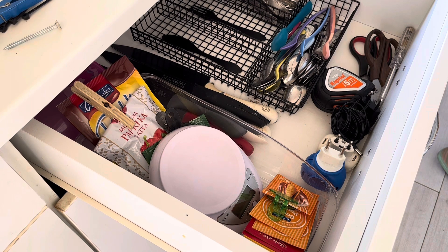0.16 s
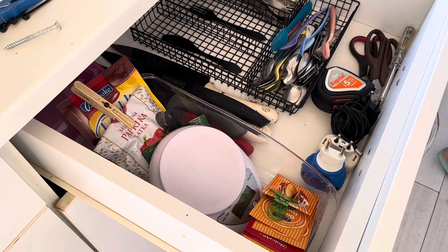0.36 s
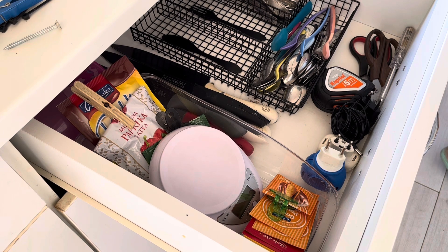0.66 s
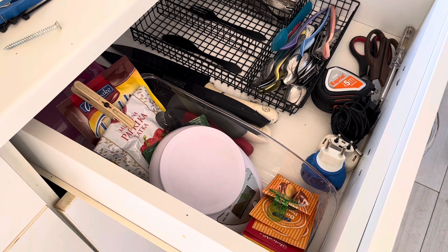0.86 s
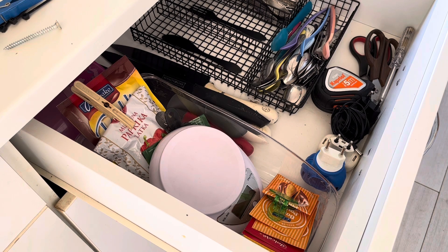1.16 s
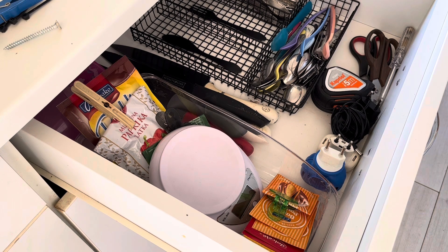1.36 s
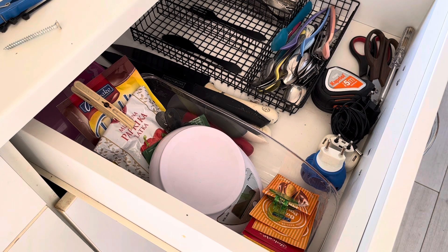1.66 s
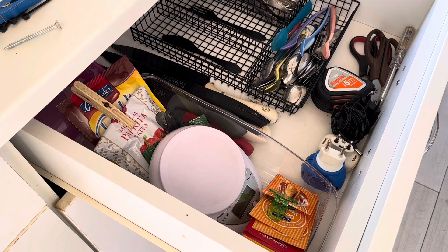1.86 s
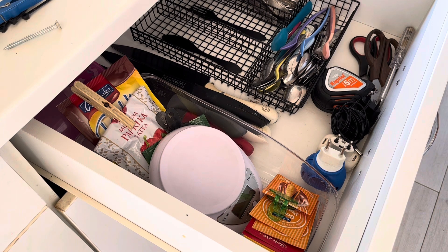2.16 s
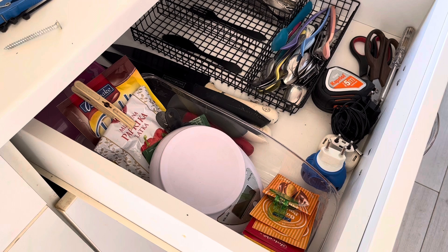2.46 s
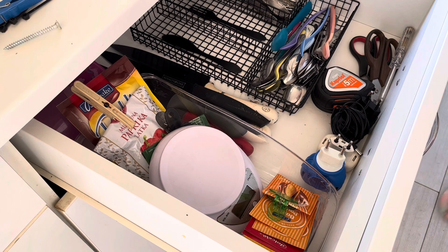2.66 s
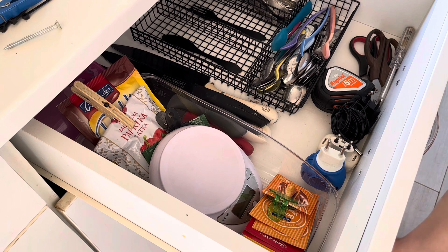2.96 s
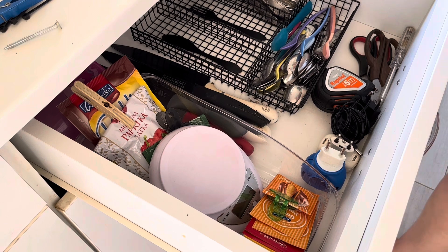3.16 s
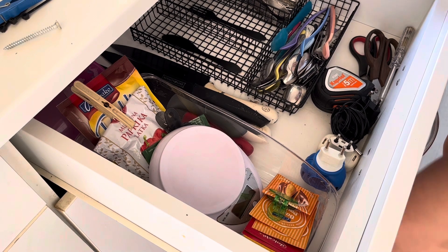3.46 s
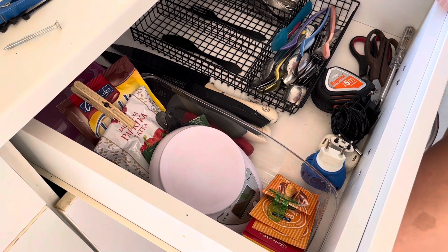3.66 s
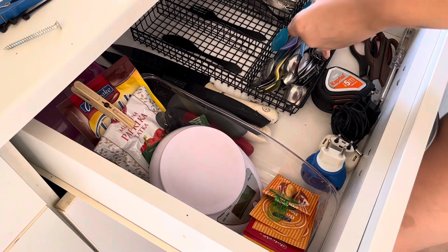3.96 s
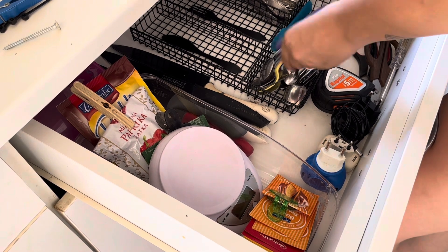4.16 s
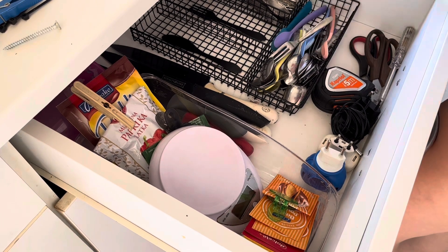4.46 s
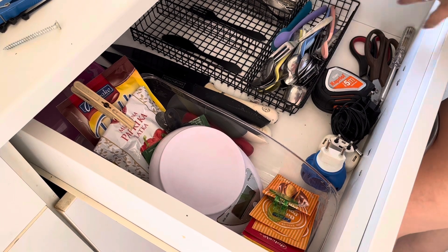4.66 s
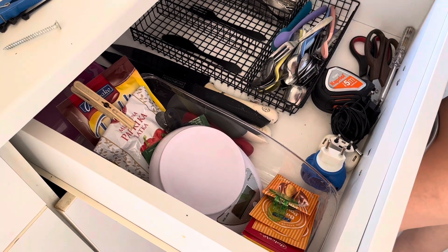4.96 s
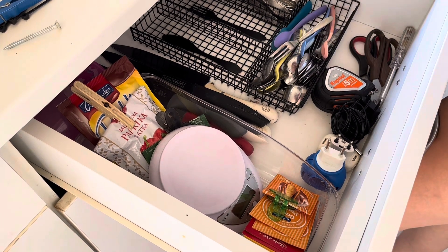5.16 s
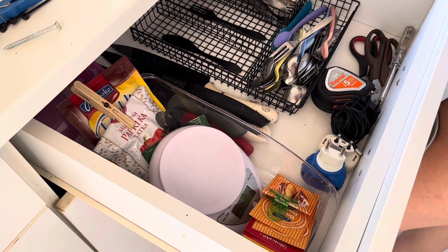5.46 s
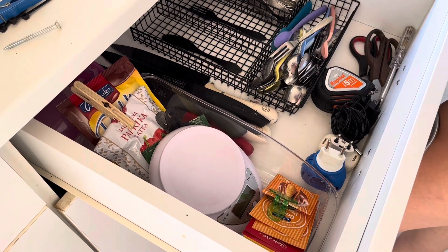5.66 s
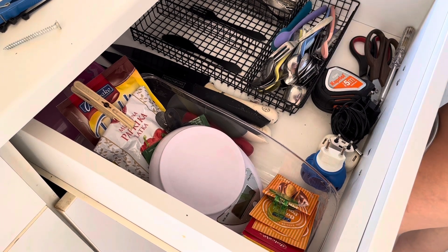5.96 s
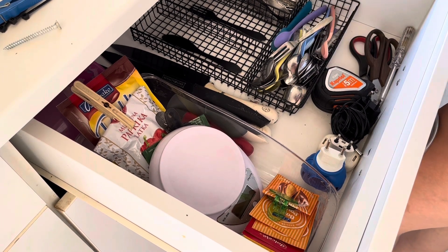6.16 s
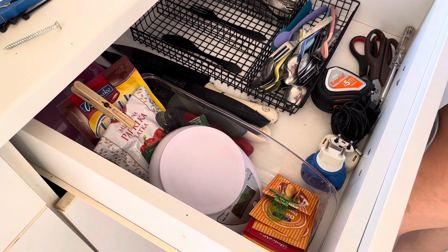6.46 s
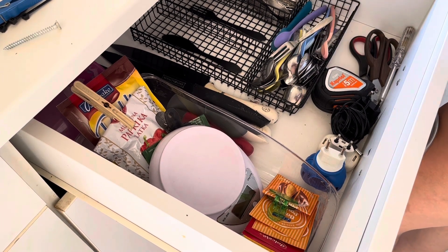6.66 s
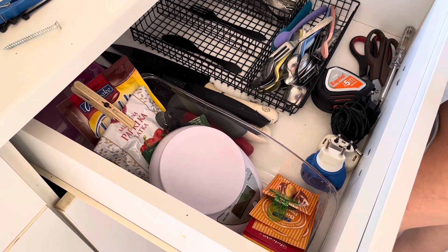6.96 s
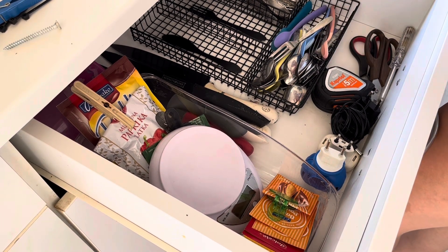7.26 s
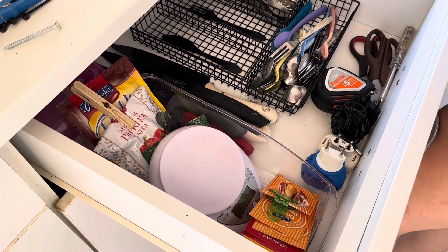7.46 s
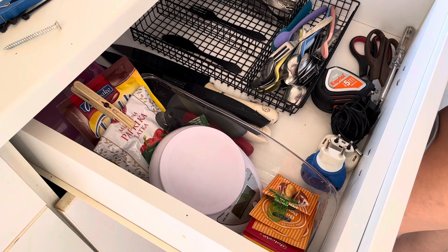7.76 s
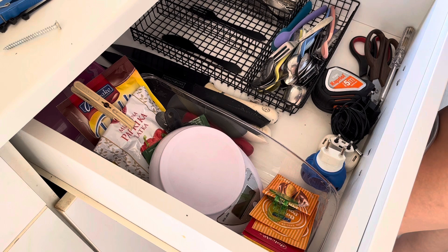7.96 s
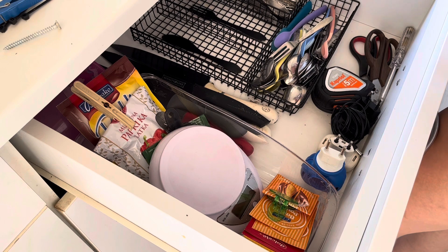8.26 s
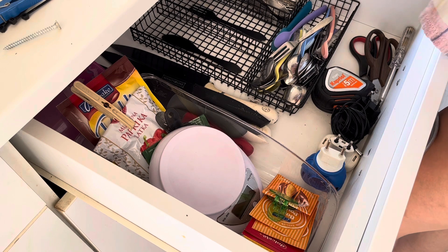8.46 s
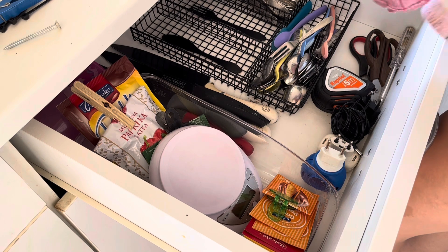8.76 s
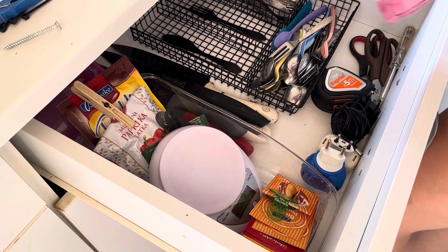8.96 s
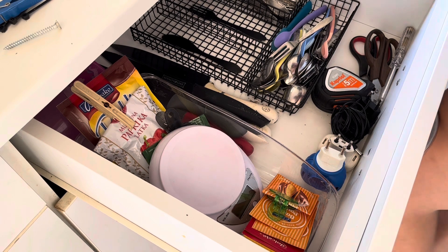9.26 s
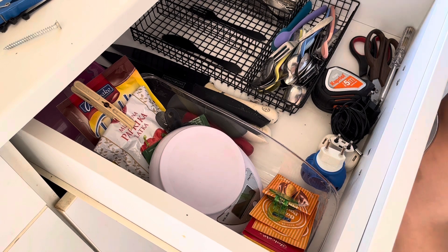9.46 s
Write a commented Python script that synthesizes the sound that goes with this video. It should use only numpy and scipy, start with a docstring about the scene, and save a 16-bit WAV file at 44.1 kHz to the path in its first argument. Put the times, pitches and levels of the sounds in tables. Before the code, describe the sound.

Steel cutlery clinks, slides and clatters as it is sorted in a wire basket, with a few thumps from the kitchen drawer.

```python
"""Close to an open drawer in a small hard kitchen, a small microphone hears steel cutlery being sorted.
Over a faint steady hum, the first pieces clink and slide, and a spoon and a fork ring on.
About a second in, a jolt makes the drawer rumble and thump; at four seconds the wire basket is struck.
Lighter touches follow, then the busiest clatter from seven seconds on. Throughout, the heap
settles in faint ticks and the kitchen rings briefly after each clink."""
import sys
import numpy as np
from scipy import signal
from scipy.fft import irfft
from scipy.io import wavfile

SR = 44100
rng = np.random.default_rng(int(sys.argv[2]) if len(sys.argv) > 2 else 0)


def wrap_up_sound(samples):
    """Save the sound to the file named by the first command line argument, as 16-bit audio."""
    columns = np.atleast_2d(samples).T
    # keep every value between -1 and 1, then stretch to whole-number steps
    tamed = np.clip(columns, -1, 1)
    steps = np.round(tamed * 32767).astype(np.int16)
    wavfile.write(sys.argv[1], SR, steps)


N = 423351
AGE = np.arange(int(.45 * SR)) / SR   # seconds since a touch
BAND_EDGES_HZ = np.geomspace(30, 17000, 24)
BAND_HZ = np.sqrt(BAND_EDGES_HZ[1:] * BAND_EDGES_HZ[:-1])


def from_db(db):
    return 10 ** (np.asarray(db) / 20)


def rms_one(x):
    return x / np.sqrt(np.mean(x ** 2) + 1e-20)


def energy_one(x):
    return x / np.sqrt(np.sum(x ** 2) + 1e-20)


def at_hz(points, hz):
    """Read rows of (Hz, value) on a log-frequency axis."""
    row_hz, value = np.transpose(points)
    return np.interp(np.log(hz), np.log(row_hz), value)


def fade(t60):
    """A decay that loses 60 dB in t60 seconds."""
    return np.exp(-np.log(1000) * AGE / np.maximum(t60, 1e-3))


def add(out, start_s, sound):
    """Mix a sound in at its start time."""
    i = max(int(start_s * SR), 0)
    out[i:i + len(sound)] += sound[:max(N - i, 0)]


def noise_bands():
    """One row of noise per band; neighbours are unrelated."""
    white = rng.standard_normal((2, N + len(AGE)))
    bands = []
    for k in range(len(BAND_HZ)):
        bandpass = signal.butter(2, BAND_EDGES_HZ[k:k + 2], "band", fs=SR, output="sos")
        bands.append(signal.sosfilt(bandpass, white[k % 2])[-N:])
    return np.array(bands)


def coloured(bands, spectrum):
    """A short random stretch of the bands, mixed to a spectrum; rms 1."""
    i = rng.integers(bands.shape[1] - len(AGE))
    return rms_one(from_db(at_hz(spectrum, BAND_HZ)) @ bands[:, i:i + len(AGE)])


def struck(modes, spread_db=2.0):
    """Decaying sines; each blow favours the modes differently."""
    out = np.zeros(len(AGE))
    for hz, db, t60 in modes:
        strength = from_db(db + spread_db * rng.standard_normal()) * rng.choice([-1, 1])
        out += strength * np.sin(2 * np.pi * hz * AGE) * fade(t60)
    return out


def slips(length_s, start_db, end_db, per_s, spread_db):
    """Catching and slipping: random little impacts under a ramp of level, for 0.45 s at most."""
    size = max(int(length_s * SR), 2)
    chance = rng.random(len(AGE))[:size]
    hit = chance <= max(per_s / SR, chance.min())   # at least one impact
    strength = from_db(spread_db * np.clip(rng.standard_normal(len(AGE))[:size], -2, 2))
    clicks = hit * strength * rng.choice([-1, 1], len(AGE))[:size]
    return rms_one(clicks) * from_db(np.linspace(start_db, end_db, len(clicks)))


# The kitchen's room tone. Each row: frequency in Hz, relative spectral density in dB.
AIR_SPECTRUM = [(30, -14), (50, -4), (100, -3), (160, -4.5), (350, -1.5), (500, 1), (800, -0.5),
                (1300, -1.5), (1700, -6), (2600, -13), (4000, -16), (9000, -18), (12000, -20), (16000, -32)]
# Resonances in that air. Each row: frequency in Hz, width in Hz, relative level in dB.
AIR_RESONANCES = [(200, 15, -22), (610, 35, -8), (1260, 100, -7), (3020, 110, -16)]


def hum(bands, air_db=-45.5, resonance_db=-47.0):
    """Steady household air noise with a few resonances, far behind the cutlery."""
    air = from_db(air_db) * rms_one(from_db(at_hz(AIR_SPECTRUM, BAND_HZ)) @ bands)
    for hz, width_hz, db in AIR_RESONANCES:
        peak = signal.iirpeak(hz, hz / width_hz / 2, fs=SR)
        drone = signal.lfilter(*peak, signal.lfilter(*peak, rng.standard_normal(N)))
        air += from_db(resonance_db + db) * rms_one(drone)
    return air


# The kitchen's reverberation. Each row: frequency in Hz, time to fall 60 dB in seconds.
KITCHEN_DECAY = [(100, 0.31), (500, 0.34), (1500, 0.34), (4000, 0.34), (9000, 0.29), (15000, 0.22)]


def reflections(x, bands, build_s=0.0016):
    """The kitchen's answer to one spot: it builds within milliseconds and dies away, the treble first."""
    i = rng.integers(N - len(AGE))
    tails = bands[:, i:i + len(AGE)] * fade(at_hz(KITCHEN_DECAY, BAND_HZ)[:, None])
    build = 1 - np.exp(-(AGE / build_s) ** 2)
    return signal.oaconvolve(x, energy_one(tails.sum(axis=0) * build))[:N]


def scattered_reflections(x, bands, spots=6, step_s=0.006):
    """Successive touches lie at different spots in the basket, each with its own paths to the mic."""
    spot = np.arange(N) / (step_s * SR)
    out = np.zeros(N)
    for k in range(spots):
        nearness = np.maximum(1 - np.abs((spot - k) % spots - 1), 0)
        out += reflections(x * np.sqrt(nearness), bands)
    return out


# The rustle of handling at the drawer. Each row: time in seconds, level in dB.
HANDLING_LEVEL = [(0, -41.5), (.15, -48), (.8, -45), (3.0, -50.5), (3.6, -45), (3.9, -88), (4.7, -59),
                  (4.8, -47.5), (5.3, -50.5), (6.0, -58), (6.7, -57), (8.0, -44.5), (9.6, -50)]
# Its colour. Each row: frequency in Hz, relative spectral density in dB.
HANDLING_SPECTRUM = [(1000, -8), (2500, 3), (4500, -1.5), (10000, -0.5), (16000, -14)]


def rustle(bands):
    """A soft bright hiss that comes and goes with the handling."""
    level_db = np.interp(np.arange(N) / SR, *np.transpose(HANDLING_LEVEL))
    hiss = rms_one(from_db(at_hz(HANDLING_SPECTRUM, BAND_HZ)) @ bands)
    return from_db(level_db) * hiss[::-1]   # reversed, so it is unrelated to the hum


def settling(bands, per_s=6.0, chances=120, low_hz=5000, high_hz=11100):
    """The heap settles in faint ticks, as strong as the handling around them; each lets a partial sing."""
    when, chance, pitch = rng.random((3, chances))
    times = when * N / SR
    scatter_db = 0.5 * np.clip(rng.standard_normal(chances), -2, 2)
    levels = np.interp(times, *np.transpose(HANDLING_LEVEL)) + 3.5 - scatter_db
    partials = low_hz + pitch * (high_hz - low_hz)
    ticks = np.column_stack([times, levels, partials])[chance < per_s * N / SR / chances]
    ring_db, dull_db, sparkle_db, sung_t60 = 3, 2, -6.0, 0.12
    out = clinks(bands, [(s, db, ring_db, dull_db, sparkle_db) for s, db, _ in ticks])
    for s, db, sung_hz in ticks:
        add(out, s, struck([(sung_hz, db + 0.5, sung_t60)]))
    return out


# Jolts of the drawer. Each row: start and length in seconds, relative first and last level in dB,
# bass gain in dB.
DRAWER_JOLTS = [(0.95, 0.064, -27.5, -21, 2), (1.016, 0.067, -26.5, -19, 4),
                (1.097, 0.067, -13.5, -24.5, 7), (2.246, 0.11, -50, -50, 39),
                (4.071, 0.012, -30, -10.5, -35), (4.104, .09, -31.5, -20.5, -9.5),
                (9.093, 0.25, -49, -31.5, -22)]
# The thud of its panels. Each row: frequency in Hz, relative spectral density in dB.
PANEL_SPECTRUM = [(45, -2), (90, -21), (120, -20), (175, -4.5), (220, -25), (285, 4.5), (420, -11),
                  (650, -3.5), (950, -4.5), (1300, -6.5), (3000, -15), (6000, -41)]
# Their modes. Each row: frequency in Hz, relative level in dB, time to fall 60 dB in seconds.
PANEL_MODES = [(172.6, -11.5, 0.28), (282, -5, 0.16), (323.5, -8.5, 0.15), (470, -7, 0.1),
               (699, -22, 0.062), (930, -11, 0.12)]


def drawer_judders(bands, thud_t60=0.03, modes_db=0.5, level_db=-2.8):
    """A jolted drawer judders in quick impacts that shake its panels."""
    out = np.zeros(N)
    for s, length_s, start_db, end_db, bass_db in DRAWER_JOLTS:
        bass = [(180, bass_db), (400, 0)]   # each jolt has its own bass, from deep thud to thin rattle
        spectrum = np.column_stack([BAND_HZ, at_hz(PANEL_SPECTRUM, BAND_HZ) + at_hz(bass, BAND_HZ)])
        for _ in range(4):   # the drawer bears on four corners
            thud = energy_one(coloured(bands, spectrum) * fade(thud_t60))
            ring = from_db(modes_db + min(bass_db, 0)) * energy_one(struck(PANEL_MODES))
            impacts = slips(length_s, start_db, end_db, per_s=500, spread_db=5.0)
            add(out, s, signal.fftconvolve(impacts, thud + ring) / 2)
    return from_db(level_db) * out


# Soft bumps on the drawer. Each row: start in seconds, level in dB.
DRAWER_BUMPS = [(1.295, -34), (1.39, -30.5), (2.16, -39.5), (2.25, -36.5), (2.818, -30.5), (2.855, -27),
                (3.32, -33), (3.679, -36.5), (3.852, -39), (9.19, -33.5), (9.26, -36.5)]


def drawer_bumps(bands, centre_hz=412, db_per_octave=-17.0, rise_s=0.0045, t60=0.25):
    """Small bumps give a short dull knock."""
    out = np.zeros(N)
    hump = np.column_stack([BAND_HZ, db_per_octave * np.abs(np.log2(BAND_HZ / centre_hz))])
    envelope = fade(t60) * (1 - np.exp(-AGE / rise_s))
    for s, db in DRAWER_BUMPS:
        add(out, s, from_db(db) * coloured(bands, hump) * envelope)
    return out


# The basket's modes. Each row: frequency in Hz, relative level in dB, time to fall 60 dB in seconds.
BASKET_MODES = [(176, -6, 0.22), (240.4, -6, 0.39), (274, -10, 0.24), (332.3, 0, 0.25), (690, -26, 0.16),
                (975, -18, 0.14), (1260, 5.5, 0.042)]
# Blows on it. Each row: start in seconds, level in dB.
BASKET_BLOWS = [(4.075, -32), (4.15, -24.5), (4.204, -29.5)]


def basket():
    """The wire basket on the drawer's bottom rings low after a blow."""
    out = np.zeros(N)
    for s, db in BASKET_BLOWS:
        add(out, s, from_db(db) * struck(BASKET_MODES))
    return out


# Modes of two pieces. Each row: frequency in Hz, relative level in dB, time to fall 60 dB in seconds.
SPOON_MODES = [(4720, -29, 0.28), (6930, -42, 0.41), (8430, -8, 0.14), (9539, -25, 0.2), (9890, -13, 0.2),
               (10735, -14, 0.14), (11970, -5, 0.12), (13700, -11, .17), (13700, -16, .16),
               (13950, -15, .16), (14600, -10, .1), (14800, -17, .15)]
FORK_MODES = [(2050, -27, 0.083), (4150, -12, .08), (4450, -30, 0.031), (4600, -13, 0.14),
              (5630, -18, 0.088), (6200, -16, .09), (8200, -16, .22), (8600, -15, .16), (9320, -21, 0.063),
              (11330, -19, 0.13), (15165, -17, .13)]
# Blows on them. Each row: start in seconds, level in dB, the partial that sings out in Hz.
SPOON_BLOWS = [(.28, -20, 6930), (.44, -26, 13950), (3.498, -27, 8430), (4.865, -25, 8430),
               (7.175, -9.5, 10735), (7.447, -16, 9890), (7.51, -18, 8430)]
FORK_BLOWS = [(.44, -14, 8600), (1.585, -11, 9320), (1.627, -27, 11330), (2.245, -25, 4450),
              (4.15, -9.5, 11330), (5.764, -30, 2050), (6.035, -20.5, 4450), (6.035, -21, 9320),
              (6.55, -27.5, 5630), (7.93, -27, 15165), (9.29, -28, 8600)]


def utensil(modes, blows):
    """A free piece rings on after a blow; the struck spot lets one partial sing at full strength."""
    out = np.zeros(N)
    for s, db, sung_hz in blows:
        sung = np.argmin([abs(hz - sung_hz) for hz, _, _ in modes])
        excited = [(hz, 0 if k == sung else level, t60) for k, (hz, level, t60) in enumerate(modes)]
        add(out, s, from_db(db) * struck(excited))
    return out


def steel_colour(dull_db, sparkle_db):
    """Spectrum of one touch as (Hz, dB re 9 kHz): thin steel radiates little below 2 kHz."""
    body_db = -2 + 0.18 * dull_db + 1.99 * min(dull_db, 0)   # dull touches gain body, thin ones lose it
    lows = [(40, body_db - 40), (150, body_db - 20), (400, body_db - 10), (1300, body_db - 3.5)]
    return lows + [(2000, body_db), (5000, dull_db), (9000, 0), (14000, sparkle_db), (16000, sparkle_db - 2)]


def pile_ring(colour, count, t60=0.14, spread_db=4.5):
    """Each touch excites other bending modes of the heap, damped by its weight; starts at rms 1."""
    hz = rng.uniform(1100, 16000, count)
    strength = from_db(at_hz(colour, hz) + spread_db * np.clip(rng.standard_normal(count), -2, 1.5))
    lines = np.zeros(len(AGE) // 2 + 1, complex)
    lines[(hz * len(AGE) / SR).astype(int)] = strength * np.exp(2j * np.pi * rng.random(count))
    return rms_one(irfft(lines, len(AGE))) * fade(t60)


# Pieces sliding and jostling. Each row: start and length in seconds, relative first and last level
# in dB, dullness in dB (5 kHz re 9 kHz).
STEEL_SLIDES = [(0.272, 0.23, -17.5, -24, -5), (0.712, 0.15, -54, -48, 26), (0.954, 0.21, -36.5, -18, 9),
                (1.329, 0.1, -24.5, -26, -5.5), (1.489, 0.022, -33, -21.5, -7.5),
                (1.59, 0.072, -16.5, -25, -6.5), (1.688, 0.21, -31, -36.5, -3),
                (2.505, 0.044, -36, -33.5, 1.5), (2.757, 0.15, -35, -21, 6.5),
                (3.385, 0.069, -34.5, -25.5, 2), (3.691, 0.067, -34.5, -52, 14),
                (4.078, 0.053, -25, -11, -12), (4.192, 0.067, -43, -24.5, -5), (4.848, 0.018, -34, -29, -4),
                (4.932, 0.067, -12.5, -17.5, -4), (5.338, 0.054, -44.5, -38, 0.5),
                (5.542, 0.21, -42.5, -41, 2), (5.997, 0.58, -31.5, -62, -1.5), (6.4, 0.095, -35, -41, 0),
                (6.768, 0.19, -45.5, -39, 4), (7.403, 0.12, -26, -19, -3), (7.526, 0.067, -27, -27.5, -5),
                (7.752, 0.15, -28, -46, -2), (8.723, 0.034, -19.5, -29, -6), (8.789, 0.26, -38.5, -27, 7.5),
                (9.073, 0.23, -25.5, -19.5, 10.5), (9.532, 0.055, -32, -38, -7)]


def slides(bands, crack_t60=0.013, ring_db=-1.0, level_db=-4.5):
    """Sliding steel catches and slips hundreds of times a second."""
    out = np.zeros(N)
    for s, length_s, start_db, end_db, dull_db in STEEL_SLIDES:
        colour = steel_colour(dull_db, sparkle_db=-3 - 0.32 * max(dull_db, 0))   # dull slides lose sparkle
        for _ in range(2):   # two points of contact at once
            crack = energy_one(coloured(bands, colour) * fade(crack_t60))
            ring = from_db(ring_db) * energy_one(pile_ring(colour, count=150))
            impacts = slips(length_s, start_db, end_db, per_s=260, spread_db=0.0)
            add(out, s, signal.fftconvolve(impacts, crack + ring) / np.sqrt(2))
    return from_db(level_db) * out


# Steel meeting steel near the microphone. Each row: start in seconds, relative level in dB, ring gain
# in dB, dullness and sparkle in dB (5 and 14 kHz re 9 kHz).
STEEL_CONTACTS = [(0.28, -19.5, 9.5, -7, 0.5), (0.432, -17, 2.5, -8, -6), (0.443, -20.5, 8, -6, 0),
                  (1.341, -28, -1, 2, -2), (1.424, -18.5, 3, -7, 0), (1.586, -12.5, 0, -9, -2),
                  (1.599, -11.5, -36, -4, 0), (1.628, -12.5, -2, -7.5, -3), (1.68, -22.5, 4.5, -8.5, -8),
                  (1.775, -29, 4, -7.5, -7), (2.043, -11, -6, -8.5, -7), (2.063, -9, -7.5, -3.5, 3.5),
                  (2.243, -23, -18, -9, -12), (2.25, -16.5, -10, 1.5, -7), (2.75, -34.5, -15, -10, -10),
                  (3.108, -21, -10, -1.5, -1), (3.184, -12, -39, -3.5, -5), (3.427, -29.5, 1.5, -8.5, -17),
                  (3.497, -11.5, -32, -8, -3.5), (3.688, -40, 2.5, -16, -2), (3.86, -33, -11, 12, -27),
                  (4.072, -9.5, -16, 5.5, 2.5), (4.082, -11, -25, 6, 3), (4.149, -10, -25, 5, 7.5),
                  (4.166, -15, -27, 18, -2), (4.181, -13, -25, -4, 0), (4.865, -26.5, 5, -8, -10),
                  (4.944, -26, -24, -8, -2), (4.957, -9, -9, -4.5, -1), (4.989, -11, -7, -8.5, 0),
                  (5.587, -31.5, -14, -1, 6), (5.647, -23, -26, 0.5, -2), (5.764, -14.5, -26, -2.5, -7),
                  (5.92, -28.5, -15, -1, -7), (6.036, -25.5, -26, -1, -4), (6.173, -31.5, 6, -4, -4),
                  (6.221, -28.5, 6, -3.5, -9), (6.275, -19, -26, -4.5, -10), (6.454, -32, -3, 2, -11),
                  (6.5, -20, -24, -2, -12), (6.55, -26.5, -22, 3, -8), (6.615, -34, -18, 2, -8),
                  (6.877, -36.5, 7.5, -4.5, -9), (6.919, -14, -14, -6, 0), (7.175, -19.5, 2, -6.5, -6.5),
                  (7.426, -20.5, 0.5, -4, -0.5), (7.449, -25, 7, -15, 4), (7.59, -23.5, -11, -13, -2),
                  (7.761, -19, -14, -4, -1), (7.884, -23, -19, -3.5, -6), (7.911, -18, -2, -0.5, 3),
                  (7.93, -6, -25, -4, 6.5), (8.113, -30, 5.5, -2, 1), (8.137, -19, -16, -2.5, 2),
                  (8.145, -10.5, -28, -9, -9), (8.3, -10, -15, -3.5, 2.5), (8.369, -15, -19, -6.5, 4),
                  (8.399, -20.5, -28, -2.5, -5), (8.504, -19, -25, -10.5, -10), (8.548, -27, -25, -21, -8),
                  (8.634, -23.5, -28, -4, 0), (8.695, -39.5, 8.5, 10, 1), (8.745, -8, -15, -9.5, -2),
                  (8.839, -26.5, 1.5, -12, -1), (8.994, -10, -8, -10.5, -5), (9.235, -17, -2, -5, 3),
                  (9.29, -8.5, -9, -12, -4), (9.301, -14, -18, -10, -6)]


def clinks(bands, contacts, crack_t60=0.024, graze_t60=0.013, rebound_t60=0.013, graze_samples=800):
    """Each contact is a swelling graze, a hard crack with one rebound, then the ring of the pile."""
    out = np.zeros(N)
    swell = fade(graze_t60)[:graze_samples][::-1]
    press = 1 - fade(t60=0.0015)   # the contact force needs a moment to build
    for s, db, ring_db, dull_db, sparkle_db in contacts:
        colour = steel_colour(dull_db, sparkle_db)
        noise = coloured(bands, colour)
        graze = from_db(-12) * noise[-graze_samples:] * swell
        crack = from_db(5) * noise * fade(crack_t60)
        rebound = from_db(-0.5) * coloured(bands, colour) * fade(rebound_t60)
        rebound_s = rng.uniform(0.002, 0.004)
        ring = from_db(ring_db + 1.5) * pile_ring(colour, count=300)
        add(out, s - graze_samples / SR, from_db(db) * graze)
        add(out, s, from_db(db) * (crack + ring) * press)
        add(out, s + rebound_s, from_db(db) * rebound)
    return out


def scene(steel_wet_db=-1.5, drawer_wet_db=-4.5, ring_wet_db=-4.0):
    """One spot beside the drawer: direct sound a little above the kitchen's answer, over the hum."""
    bands = noise_bands()
    steel = clinks(bands, STEEL_CONTACTS) + slides(bands)
    rings = utensil(SPOON_MODES, SPOON_BLOWS) + utensil(FORK_MODES, FORK_BLOWS) + basket()
    drawer = drawer_judders(bands) + drawer_bumps(bands)
    room = from_db(steel_wet_db) * scattered_reflections(steel, bands)
    room += reflections(from_db(drawer_wet_db) * drawer + from_db(ring_wet_db) * rings, bands)
    background = hum(bands) + rustle(bands) + settling(bands)
    return (background + room + drawer + rings + steel)[None]


def record(dry, ceiling=1.7, low_cut_hz=42, high_cut_hz=15900):
    """The small microphone drops the lowest bass and rounds the loudest peaks; the top is cut."""
    lean = signal.sosfilt(signal.butter(6, low_cut_hz, "high", fs=SR, output="sos"), dry)
    rounded = ceiling * np.tanh(lean / ceiling)
    return signal.sosfilt(signal.ellip(12, .1, 85, high_cut_hz, fs=SR, output="sos"), rounded)


dry = scene()
out = record(dry)
wrap_up_sound(out)
```